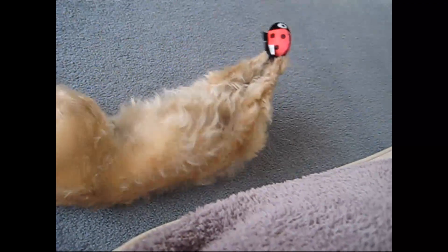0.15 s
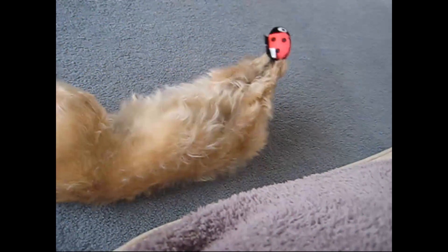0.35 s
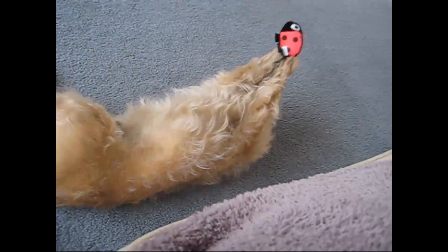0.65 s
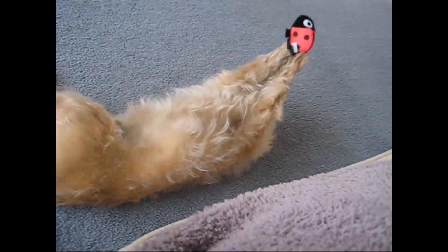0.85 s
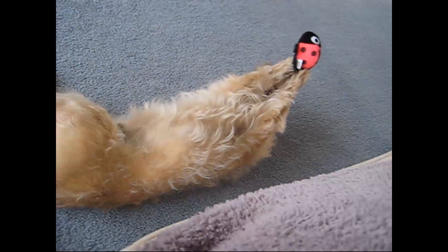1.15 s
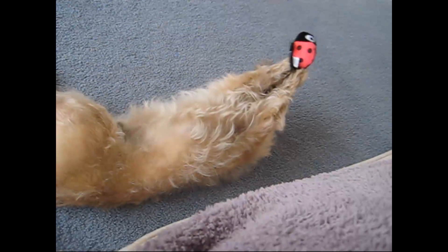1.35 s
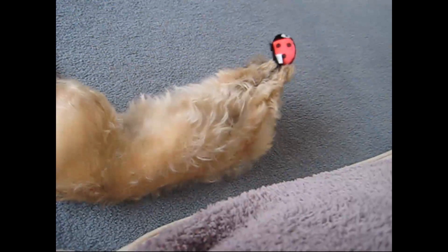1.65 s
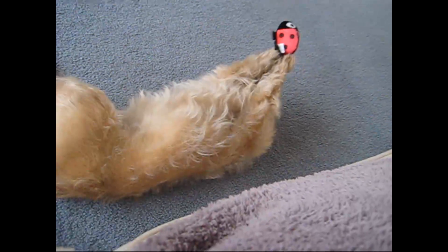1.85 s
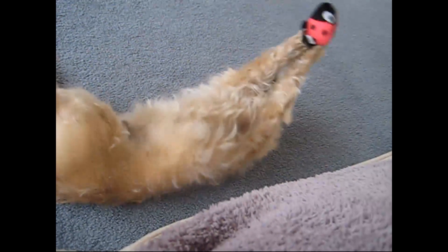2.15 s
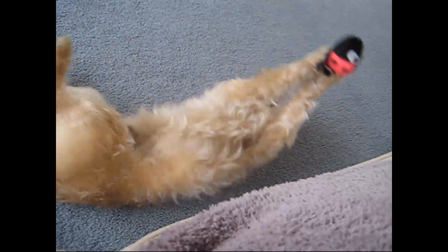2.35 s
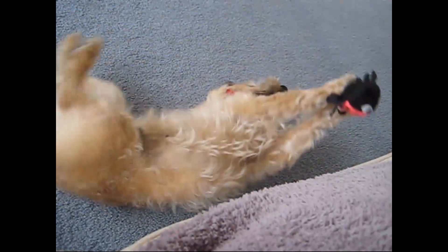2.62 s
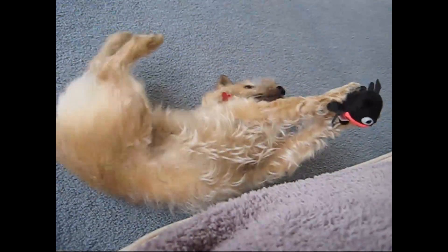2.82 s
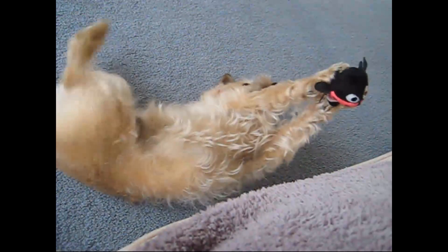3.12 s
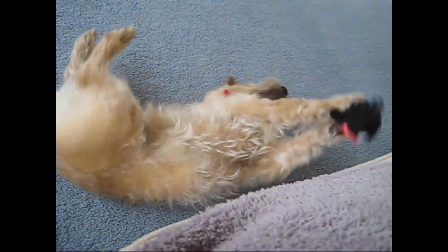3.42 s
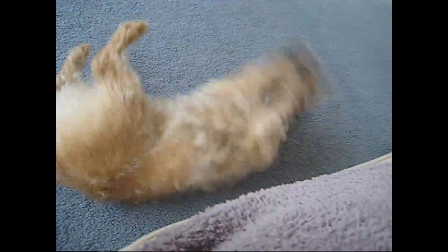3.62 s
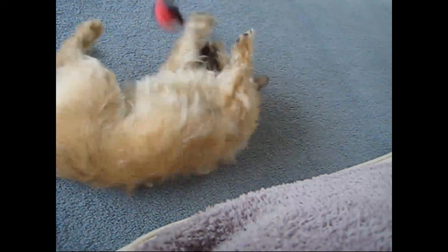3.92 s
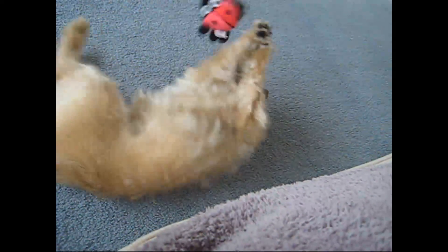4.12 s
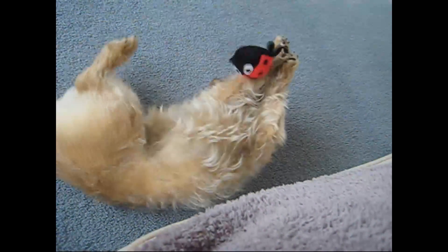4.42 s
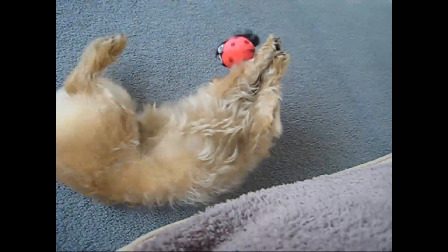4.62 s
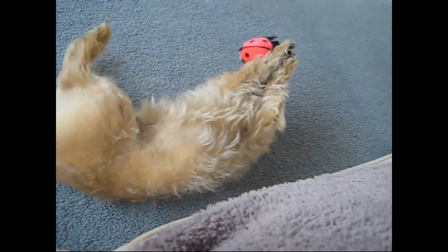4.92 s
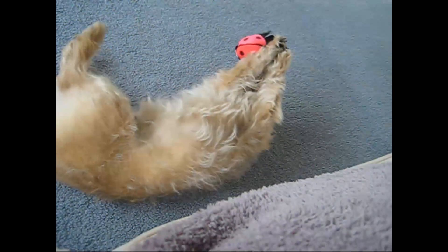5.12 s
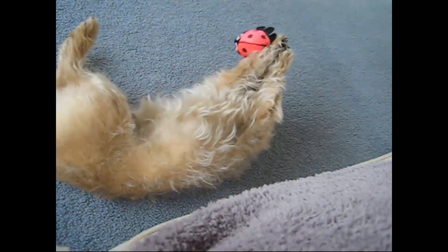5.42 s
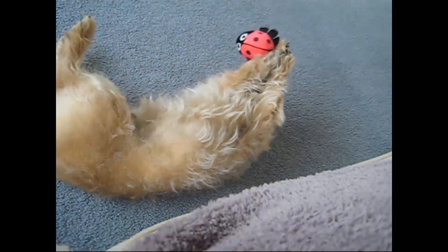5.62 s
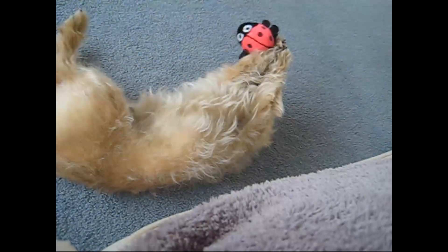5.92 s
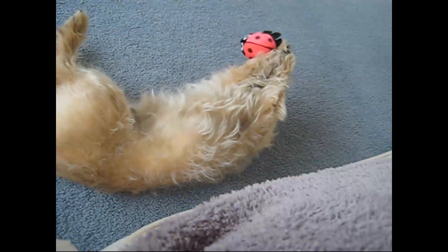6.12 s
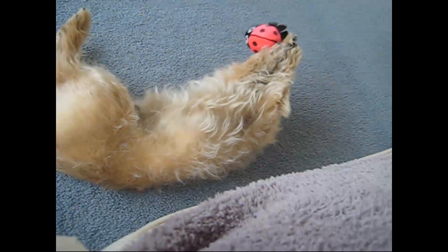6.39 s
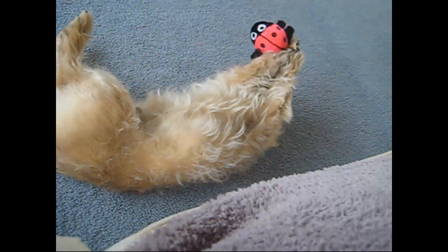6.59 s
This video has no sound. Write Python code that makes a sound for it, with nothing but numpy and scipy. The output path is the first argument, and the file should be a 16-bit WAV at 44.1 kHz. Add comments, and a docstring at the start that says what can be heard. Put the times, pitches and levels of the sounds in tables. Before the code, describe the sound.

Two brief bursts of hard, dry plastic rattling, each followed by a crisp ratcheting zip as the toy's string is pulled. After sparse knocks, another short zip and several separate clicks, it runs again for over three seconds: strong uneven buzzing with louder knocks, softened in places, then weaker chattering to the end. Close microphone, small soft room, short tail, light hiss and a barely audible very high whine.

```python
"""First heard is the rattle of a plush wind-up toy already running back, close to a small camera.
Driven impact: an off-centre weight strikes the plastic case four times a turn and a small gear ticks.
A dog on a carpet pulls the string, clicking a pawl over ratchet teeth; some louder knocks stand out.
Every blow excites decaying resonant modes. A short room tail follows, over the camera's hiss and whine."""
import sys
import numpy as np
from scipy import signal
from scipy.fft import rfft, irfft
from scipy.io import wavfile
from scipy.ndimage import uniform_filter1d

SR = 44100
rng = np.random.default_rng(int(sys.argv[2]) if len(sys.argv) > 2 else 0)


def transcribe(signal):
    """Save signal, clipped to [-1, 1], as a 16-bit WAV file at the path in sys.argv[1]."""
    frames = np.atleast_2d(signal).T
    limited = np.clip(frames, -1, 1)
    pcm = np.round(limited * 32767).astype(np.int16)
    wavfile.write(sys.argv[1], SR, pcm)


def volts_from_decibels(level):
    """Turn decibel levels (scalar or array-like) into linear amplitude factors."""
    exponent = np.asarray(level, float) / 20
    return 10 ** exponent


N = 297675  # length in samples

# rotation of the weight, one table a run: (t/s, turns made, lead of the first slap before its knock/turns)
ROTATION = [
    [(-0.0256, 0, .15), (0.0584, 3, .2), (0.232, 9, .24), (0.4075, 15, .25), (0.6057, 21, .2)],
    [(0.968, 0, .22), (1.2311, 9, .29), (1.4905, 18, .16), (1.7513, 27, .21), (1.8771, 31, .27)],
    [(3.5085, 0, .22), (3.5821, 3, .17), (3.6687, 6, .2), (3.9053, 15, .2), (3.9824, 18, .13),
     (4.1211, 24, .18), (4.3367, 33, .15), (4.5696, 42, .22), (4.9677, 57, .29), (5.0515, 60, .3),
     (5.3259, 69, .27), (5.5275, 75, .24), (5.7128, 81, .27), (6.0078, 90, .22), (6.1004, 93, .17),
     (6.2997, 99, .22), (6.513, 105, .17), (6.7379, 111, .25)],
]
# strength of the blows, one table a run:
# (t/s, basic knock level/dB, second knock over first level/dB, slaps over knocks level/dB)
BLOW_STRENGTH = [
    [(-.03, -30, -10, -5), (.06, -18.5, 1, 2.5), (.15, -20.5, 2.5, 6.5), (.33, -18.5, 10, 2),
     (.41, -30.5, 5.5, 6.5), (.61, -45.5, 0, 3)],
    [(.97, -54.5, 4, 12), (1.06, -25, -3, -14), (1.14, -19, 1.5, -9), (1.23, -27.5, 5.5, 0),
     (1.4, -17.5, 1, -2.5), (1.5, -22.5, 2, 7), (1.68, -16.5, -3.5, 2), (1.75, -22.5, -1, -5),
     (1.88, -43, 10, -3)],
    [(3.51, -44, 0, 4), (3.58, -27.5, 2, 14), (3.67, -21, 3, 0.5), (3.91, -21, 2, 3.5), (3.98, -25, 8, 5),
     (4.05, -23, 6, -1), (4.12, -19, 4, 2.5), (4.19, -23.5, 6, 10.5), (4.3, -20, 4, 0),
     (4.42, -23, -9, 5.5), (4.6, -15.5, 3, -4), (4.75, -15.5, -4.5, -4.5), (4.97, -18, 4, -7),
     (5.15, -37, 17, -1), (5.35, -38.5, 17, -4), (5.42, -38, 10, 2), (5.55, -35, 9, -2.5),
     (5.73, -32, 9, -2), (5.9, -41, 0, 12), (6.2, -34, 3.5, -15), (6.4, -37, 1, -4), (6.75, -48, -14, 1)],
]
# the four blows of a turn: (basic spread of the bounces/s, low-group level/dB)
BLOWS_OF_A_TURN = [(.004, -1.5), (.0016, -6), (.002, -1.5), (.0014, -0.5)]
# how freely the held case sounds: (t/s, low-group level/dB, shell level/dB, upper-group level/dB)
GRIP_ON_CASE = [(0, -11, -1, -7.5), (.35, -7, -3, -7.5), (.5, -9, 2.5, -12), (1.05, -8, -2, -6),
                (1.2, -12.5, -4, -13), (1.35, -5.5, -1.5, -1.5), (1.6, -9.5, -3.5, -9),
                (1.8, -9.5, -4.5, -15), (3.55, -2.5, 4.5, 1.5), (3.9, -1.5, 0.5, -5), (4.1, -5.5, 2, -3.5),
                (4.4, -1.5, -1.5, 0), (4.75, -4.5, -14, -5.5), (5.1, -6.5, -2, -3), (6, -4, 3.5, 0),
                (6.75, -11, -3, -6)]
# the paws press and soften the blows: (start t/s, end t/s, added level/dB)
PAW_PRESSES = [(3.5, 3.575, -14.5), (3.573, 3.674, -14.5), (3.931, 4.078, -11.5), (1.613, 1.636, -8),
               (4.74, 4.765, -9.5), (5.383, 5.515, -8.5), (5.761, 6.177, -8), (6.36, 6.68, -4)]
# by run: (lead of the second slap before its knock/turns, second slap over first level/dB,
# factor on the spread of the bounces)
RUN_TRAITS = [(.18, -11.5, 1.1), (0.201, -10.5, 1.1), (.24, -1, .75)]


def weight(rotation, strength, second_lead, second_db, bounce_factor):
    """Periodic impact: two knocks half a turn apart, each led by a slap as the slack is taken up."""
    s, turns, lead = np.transpose(rotation)
    n = np.arange(turns[-1])
    second = second_lead + .012 * rng.standard_normal(len(n))
    # order of blows: first slap, first knock, second slap, second knock
    place = np.stack([n - np.interp(n, turns, lead), n, n + .5 - second, n + .5], axis=1)
    place = place + .007 * rng.standard_normal(place.shape)
    at = np.interp(place.ravel(), turns, s)
    which = np.arange(len(at)) % len(BLOWS_OF_A_TURN)

    knock_db, lean_db, slap_db = column(strength, at)
    blow_db = np.choose(which, [slap_db, -lean_db / 2, slap_db + second_db, lean_db / 2])
    db = knock_db + blow_db + 0.88 * rng.standard_normal(len(at))
    for start, end, held_db in PAW_PRESSES:
        db = db + held_db * (start < at) * (at < end)

    spread, blow_low_db = np.transpose(BLOWS_OF_A_TURN)[:, which]
    grip_low_db, shell_db, upper_db = column(GRIP_ON_CASE, at)
    # the striking spot of each blow creeps over a few turns
    spot = rng.standard_normal((len(n), len(BLOWS_OF_A_TURN) * len(CASE_MODES)))
    spot = uniform_filter1d(spot, size=6, axis=0)
    spot = spot.reshape(len(at), -1) / spot.std()
    return case(at, db, bounce_factor * spread, grip_low_db + blow_low_db, shell_db, upper_db, spot)


# strength of the gear: (t/s, basic tick level/dB)
GEAR_STRENGTH = [(0, -41), (.5, -46), (.62, -54), (.95, -53), (1.2, -43), (1.85, -47.5), (3.5, -49),
                 (4, -40), (5, -37.5), (5.5, -41.5), (6.75, -41.5)]
# modes of a gear tooth: (f/Hz, bandwidth f/Hz, relative level/dB)
TOOTH_MODES = [(3130, 560, -4.5), (4240, 920, -15), (5400, 520, -3.5), (6270, 550, -4), (7170, 530, -0.5),
               (8100, 390, -15)]


def gear(rotation, teeth_per_turn=5):
    """Tooth-mesh excitation: small ticks locked to the turning, each of random strength."""
    s, turns, _ = np.transpose(rotation)
    n = np.arange(rotation[-1][1] * teeth_per_turn)
    place = n / teeth_per_turn + 0.018 * rng.standard_normal(len(n))
    at = np.interp(place, turns, s)
    db = column(GEAR_STRENGTH, at)[0] + 4.14 * rng.standard_normal(len(n))
    return volts_from_decibels(1.5) * ring(at, db, .0006, TOOTH_MODES, 2400, count=3)


# pulls of the string, one table a pull: (t/s, ratchet teeth passed)
STRING_PULLS = [
    [(0.6342, 0), (0.6516, 1), (0.7184, 7), (0.733, 9), (0.767, 15), (0.7943, 19), (0.8186, 22),
     (0.8403, 24)],
    [(1.9098, 0), (1.9209, 1), (1.9491, 4), (1.9735, 7), (1.9955, 11), (2.0262, 18), (2.1426, 45),
     (2.2228, 64), (2.2513, 70), (2.2635, 72), (2.2708, 73), (2.2846, 74)],
    [(2.5533, 0), (2.5852, 3), (2.6194, 4), (2.6473, 7), (2.6644, 10), (2.6941, 16), (2.7164, 20)],
    [(3.1747, 0), (3.2092, 1), (3.2286, 2), (3.2439, 3), (3.2645, 4), (3.2901, 5), (3.3657, 6)],
]
# by pull: (basic click level/dB, added first-click level/dB, added last-click level/dB,
# tooth where the wheel runs highest, added level above 7.5 kHz/dB)
PULL_TRAITS = [(-23.5, 2, -2, 1.9, -8), (-23.5, 2, 2.5, 2.4, -5.5), (-23.5, 1.5, -7.5, 10.4, 4.5),
               (-22.5, 1, -1, 5.7, 1.5)]
# modes of the ratchet: (f/Hz, bandwidth f/Hz, relative level/dB)
PAWL_MODES = [(2190, 390, -11.5), (3010, 600, -6), (3800, 680, -0.5), (4500, 330, -1), (5110, 470, 0.5),
              (6100, 380, -4.5), (6510, 600, -1), (8100, 520, -6.5), (10270, 610, -10), (12500, 960, -11),
              (14600, 1200, -13)]


def ratchet(pull, level_db, first_db, last_db, high_tooth, treble_db):
    """Pawl-and-wheel impact: one click a tooth, and a softer rebound a moment later."""
    speed_db = 4  # per doubling of speed above 100 teeth a second
    wheel_teeth, runout_db, uneven_db = 12, 3, 0.5  # out-of-round wheel; chance of each tooth
    s, teeth = np.transpose(pull)
    n = np.arange(round(teeth[-1]) + 1)
    at = np.interp(n, teeth, s)
    interval = np.gradient(at)  # s per tooth

    db = level_db + speed_db * np.log2(np.maximum(.01 / interval, 1))
    db = db + first_db * (n == 0) + last_db * (n == n[-1])
    db = db + runout_db * np.cos(2 * np.pi * (n - high_tooth) / wheel_teeth)
    db = db + uneven_db * rng.standard_normal(len(n))
    rebound = at + .0062 + .0005 * rng.standard_normal(len(n))
    # rebounds are weaker still when the teeth pass quickly
    rebound_db = db - 12.5 - 8 * (interval < .013) + 2 * rng.standard_normal(len(n))

    hz = np.transpose(PAWL_MODES)[0]
    bright_db = treble_db * (hz > 7500)
    # a slowly lifted pawl snaps home fully and rings its upper modes more
    slow = np.tile(np.clip(interval / .012, 0, 1), 2)[:, None, None]
    snap_db = slow * (2 + 3 * (hz > 5500))
    times, levels = np.r_[at, rebound], np.r_[db, rebound_db]
    return volts_from_decibels(-4) * ring(times, levels, .0026, PAWL_MODES, 2030, bright_db + snap_db, fall_db=6.5)


# louder single knocks: jolts, starts, stalls, and late in the last run some of the weight's own
# half-turn hits: (t/s, basic level/dB, low-group level/dB, upper-group level/dB)
LOUDER_KNOCKS = [(0.8912, -33, -22, -12), (1.7964, -21, -18, -17), (2.354, -35.5, -24, 0),
                 (2.364, -33.5, -22, -6), (2.5347, -38, -23, 2), (2.72, -32, -23, -13),
                 (3.0146, -39, -14, -2), (3.028, -39, -15, 0.5), (3.3012, -33.5, -14, -11),
                 (3.377, -33, -17, -13), (3.491, -39, -14, 0), (3.551, -36, -6, -12), (3.5772, -22.5, 1, 1),
                 (3.587, -19.5, -6, -4.5), (3.9928, -19.5, -13, -6), (4.0024, -19, -26, -16),
                 (4.0371, -18.5, -30, -17), (4.051, -18, -29, -5), (4.771, -22.5, -1.5, -5),
                 (5.998, -23, -5, -21), (6.181, -23.5, -13, 0), (6.283, -27, -8.5, -12),
                 (6.315, -28, -8, -11.5), (6.7032, -28, -14, -14), (6.7215, -23.5, -18, -10),
                 (6.7366, -27, -18, -4)]


def louder_knocks():
    """Transient impact: louder knocks set one by one, each at a striking spot of its own."""
    s, db, low_db, upper_db = np.transpose(LOUDER_KNOCKS)
    spot = rng.standard_normal((len(s), len(CASE_MODES)))
    return case(s, db, 0.0027, low_db, 0 * s, upper_db, spot)


# modes of the case: (f/Hz, bandwidth f/Hz, relative level/dB, level group by its whole part:
# 0 low thump and the 3.6 kHz ring, 1 shell, 2 the 5.3 kHz ring, 3 the 4.4 kHz and upper rings)
CASE_MODES = [(870, 200, -19, 0), (1098, 120, -10.5, 0), (1240, 95, -9, 0), (1372, 128, -6, 0),
              (1610, 143, -13.5, 0), (2494, 450, -2, 1), (3020, 416, -2.5, 1), (3610, 267, -0.5, 0.5),
              (4440, 390, 4, 3), (4850, 296, 1, 1.5), (5340, 590, 1.5, 2.5), (6560, 680, 3, 3),
              (7420, 540, -2.5, 3), (8700, 290, -13.5, 3), (9240, 330, -21, 3), (11500, 2500, -26, 3)]


def case(s, db, spread, low_db, shell_db, upper_db, spot):
    """Modal participation: group levels and the striking spot decide how far each case mode sounds."""
    spot_db = 3  # weight of the striking spot
    groups = np.stack([low_db, shell_db, 0 * low_db, upper_db], axis=1)
    group_of_mode = [int(mode[-1]) for mode in CASE_MODES]
    mode_db = groups[:, group_of_mode] + spot_db * spot
    return volts_from_decibels(-2.5) * ring(s, db, spread, CASE_MODES, 827, mode_db[:, None])


def ring(s, db, spread, modes, low_hz, mode_db=0, fall_db=9, chance_db=2.5, count=9):
    """Modal synthesis: a flurry of bounces excites damped resonators, each by a random amount."""
    late = rng.random((len(s), count)) * (np.arange(count) > 0)  # the first bounce is on time
    size = rng.standard_normal((len(s), count, len(modes)))
    times = s[:, None] + late * np.reshape(spread, (-1, 1))
    at = np.clip(np.round(times * SR).astype(int), 0, N - 1)

    share = np.sign(size) * volts_from_decibels(chance_db * abs(size) - fall_db * late[:, :, None])
    # the bounces divide the blow's energy
    share /= np.sqrt((share ** 2).sum(axis=1).mean(axis=1))[:, None, None]
    audible_db = np.where(s > 0, db, -200)  # blows before the start are muted
    gain = share * volts_from_decibels(audible_db[:, None, None] + mode_db)

    first, last = at.min(), min(at.max() + SR // 20, N)
    out = np.zeros(last - first)
    for k, (hz, width, level_db, *_) in enumerate(modes):
        decay, turn = np.exp(-np.pi * width / SR), 2 * np.pi * hz / SR
        blows = np.bincount(at.ravel() - first, gain[:, :, k].ravel(), len(out))
        resonator = [1, -2 * decay * np.cos(turn), decay * decay]
        out += volts_from_decibels(level_db) * signal.lfilter([0, np.sin(turn)], resonator, blows)
    # so small a thing radiates nothing below its lowest mode
    high_pass = signal.butter(6, low_hz, "high", fs=SR, output="sos")
    out = signal.sosfilt(high_pass, out)
    return np.pad(out, (first, N - last))


def column(rows, s):
    """Linear interpolation: reads every column of a curve at the times s."""
    at, *columns = np.transpose(rows)
    return np.array([np.interp(s, at, c) for c in columns])


def room(x, t60=0.29):
    """Diffuse reverberation: dense, exponentially dying noise after 3 ms, in a small carpeted room."""
    t = np.arange(SR // 2) / SR
    tail = rng.standard_normal(len(t)) * volts_from_decibels(-60 * t / t60) * (t > .003)
    tail = signal.lfilter([1], [1, -.45], tail)  # carpet and cloth swallow the treble
    return signal.fftconvolve(x, tail / np.linalg.norm(tail))[:N]


# spectrum of the hiss: (f/Hz, relative level per Hz/dB)
HISS_SPECTRUM = [(15, -22), (30, -2), (100, 0.5), (300, -0.5), (700, -3), (1500, -6), (3000, -7.5),
                 (6000, -11.5), (9000, -15), (11500, -17.5), (13000, -20), (14300, -11), (15200, -10.5),
                 (16000, -11)]
# whine of the camera electronics: (f/Hz, rms level/dB)
CAMERA_WHINE = (15150, -71)


def hiss():
    """Stationary noise: spectrally shaped microphone and room hiss with one thin high tone."""
    hz = np.fft.rfftfreq(N, 1 / SR)
    f, db = np.transpose(HISS_SPECTRUM)
    shape_db = np.interp(np.log(hz + 1), np.log(f + 1), db)
    noise = irfft(rfft(rng.standard_normal(N)) * volts_from_decibels(shape_db), N)
    whine_hz, whine_db = CAMERA_WHINE
    whine = np.sqrt(2) * volts_from_decibels(whine_db) * np.sin(2 * np.pi * whine_hz * np.arange(N) / SR)
    return volts_from_decibels(-50.5) * noise / noise.std() + whine


def scene():
    """Superposition: the toy's direct sound, its room tail and the steady background add."""
    spin = sum(map(weight, ROTATION, BLOW_STRENGTH, *np.transpose(RUN_TRAITS)))
    spin = spin + sum(map(gear, ROTATION))
    pulls = sum(map(ratchet, STRING_PULLS, *np.transpose(PULL_TRAITS)))
    toy = louder_knocks() + pulls + spin
    return (toy + volts_from_decibels(-14) * room(toy) + hiss())[None]


def top_cut(x):
    """Nothing passes above the cut-off."""
    return signal.sosfilt(signal.butter(12, 16510, fs=SR, output="sos"), x)


def record(dry):
    """Band limitation: a linear-phase low-pass filter removes the extreme treble."""
    low_pass = signal.firwin(255, 15400, window=("kaiser", 7), fs=SR)
    mix = signal.oaconvolve(dry, low_pass[None], "same")
    return top_cut(mix)


dry = scene()
out = record(dry)
transcribe(out)
```